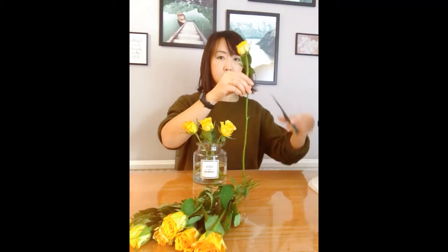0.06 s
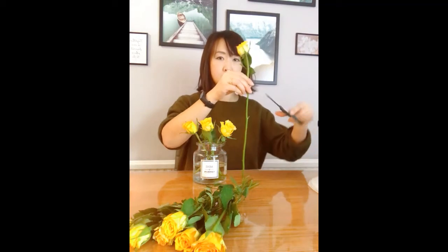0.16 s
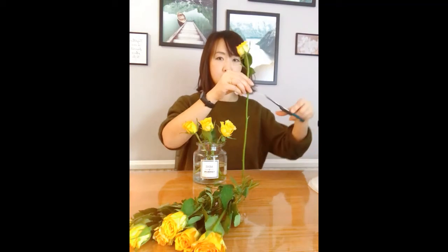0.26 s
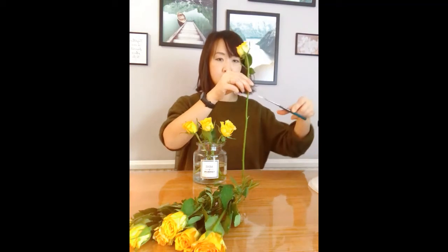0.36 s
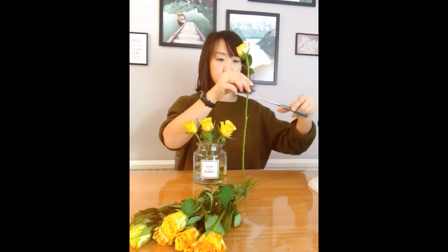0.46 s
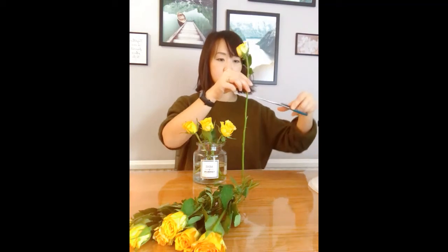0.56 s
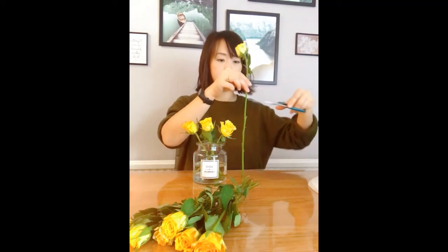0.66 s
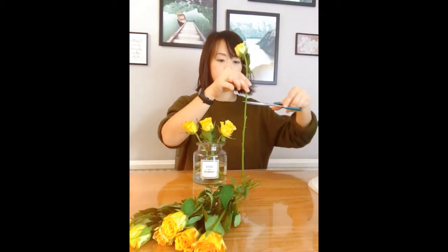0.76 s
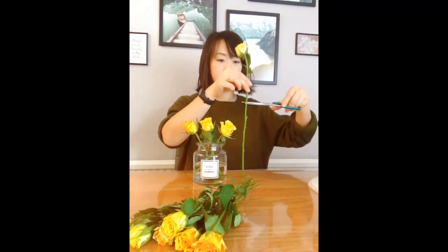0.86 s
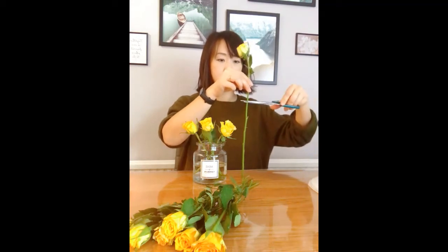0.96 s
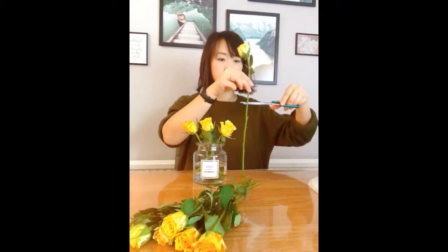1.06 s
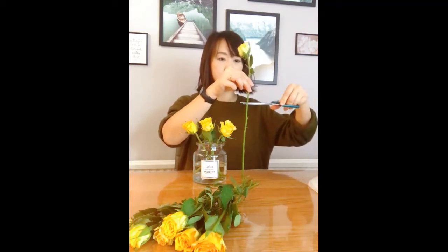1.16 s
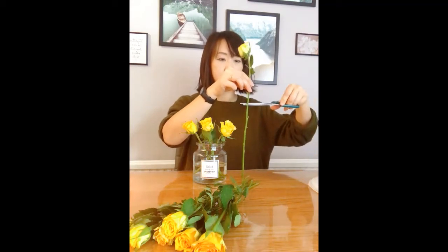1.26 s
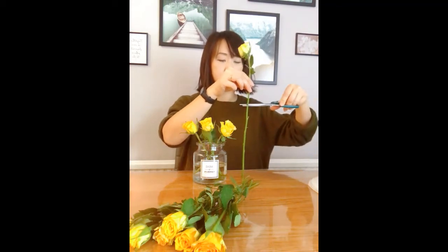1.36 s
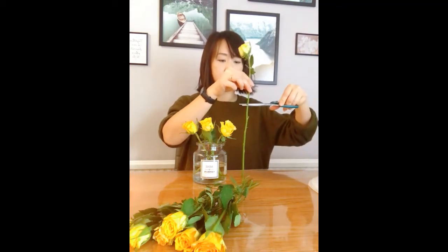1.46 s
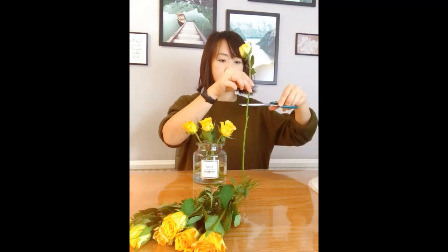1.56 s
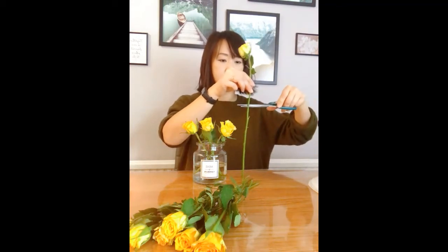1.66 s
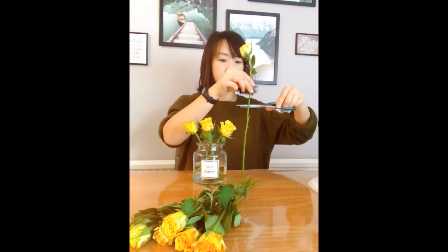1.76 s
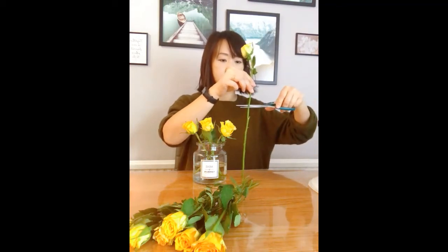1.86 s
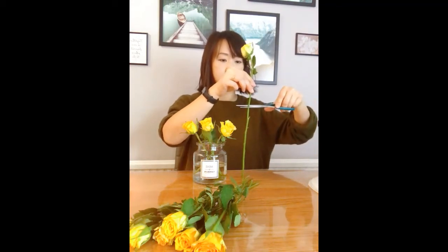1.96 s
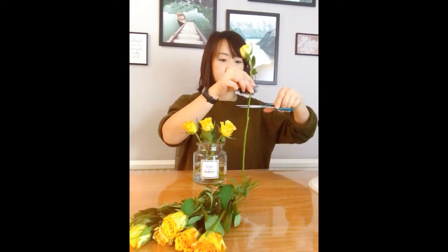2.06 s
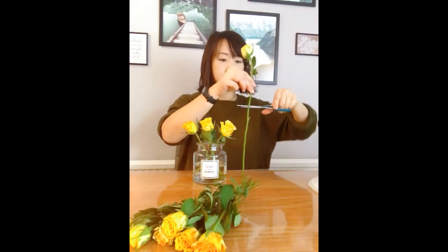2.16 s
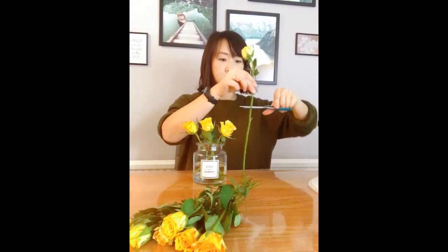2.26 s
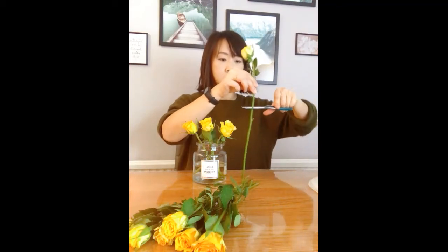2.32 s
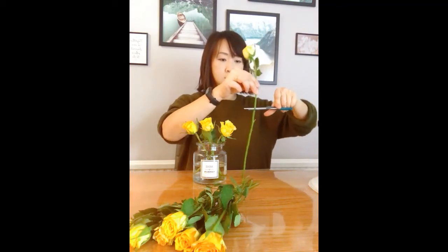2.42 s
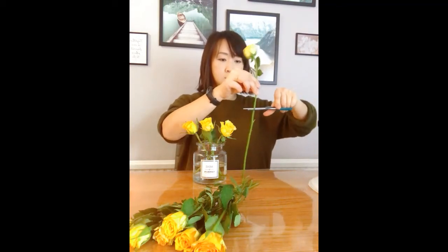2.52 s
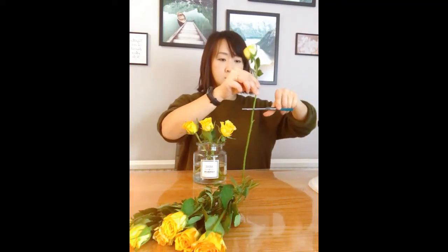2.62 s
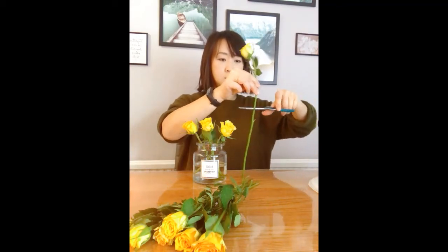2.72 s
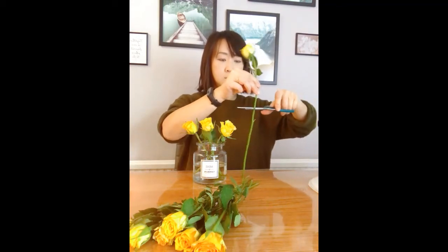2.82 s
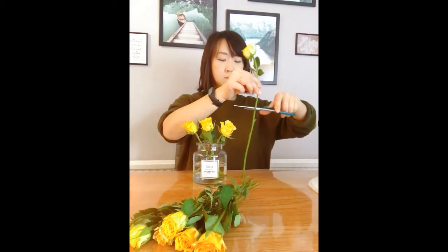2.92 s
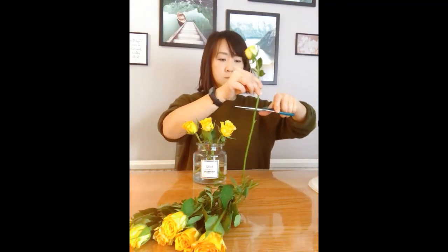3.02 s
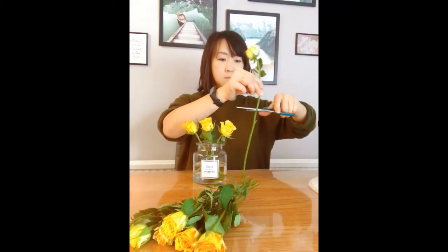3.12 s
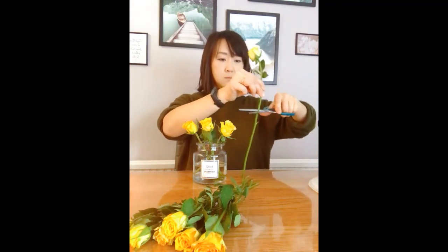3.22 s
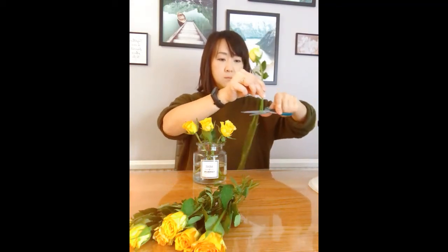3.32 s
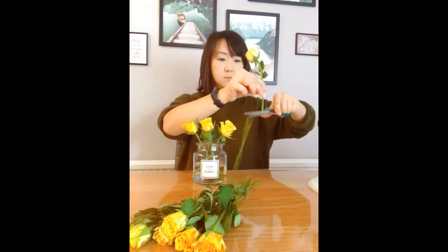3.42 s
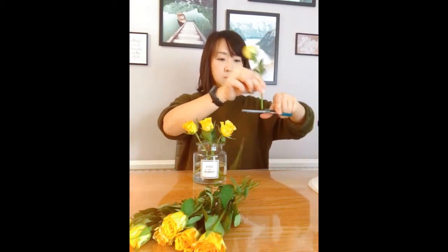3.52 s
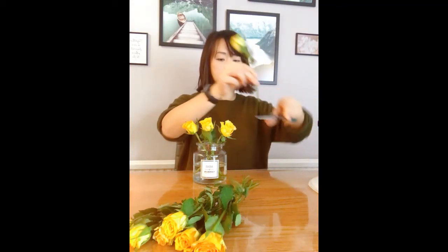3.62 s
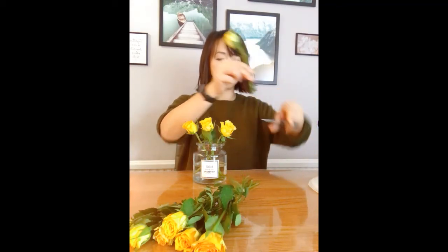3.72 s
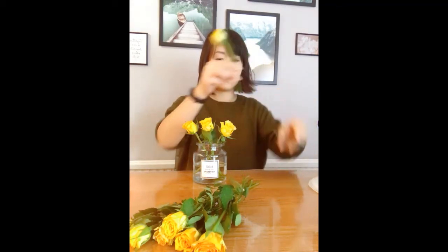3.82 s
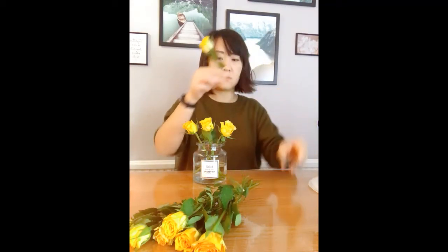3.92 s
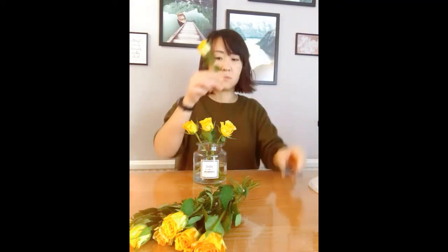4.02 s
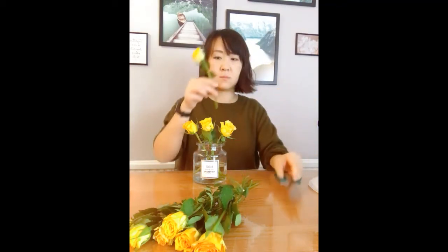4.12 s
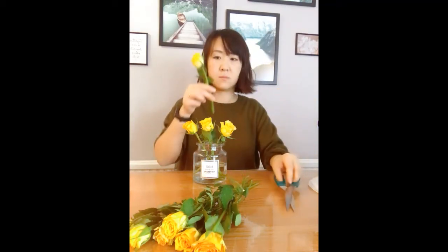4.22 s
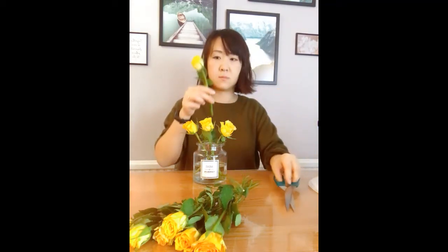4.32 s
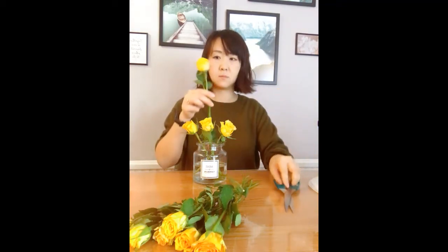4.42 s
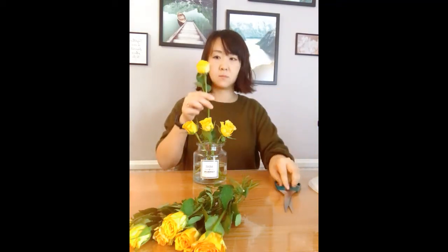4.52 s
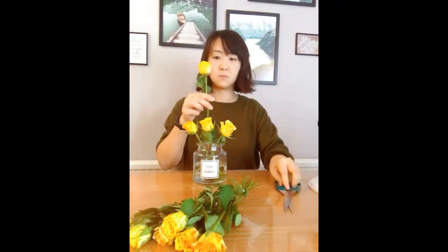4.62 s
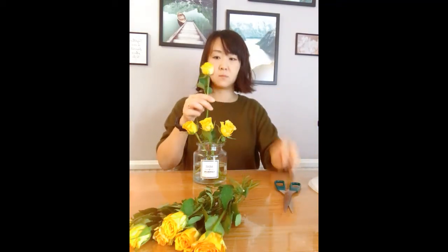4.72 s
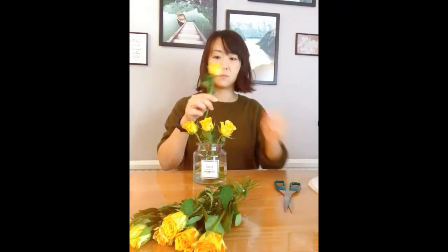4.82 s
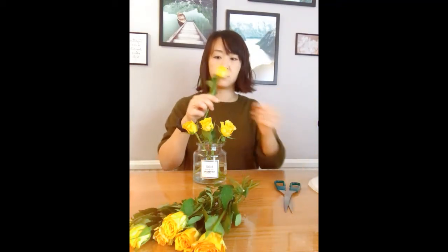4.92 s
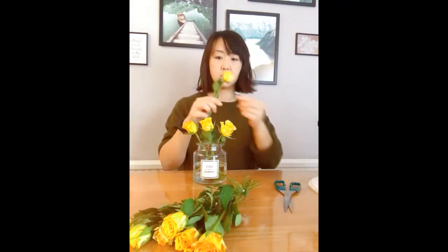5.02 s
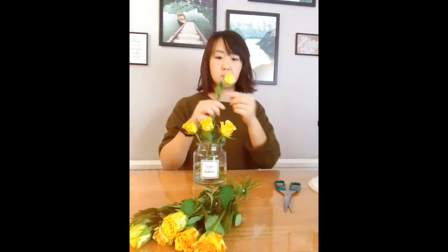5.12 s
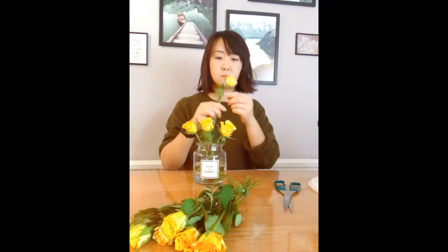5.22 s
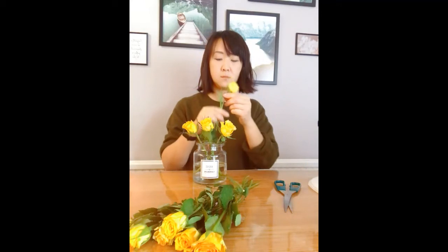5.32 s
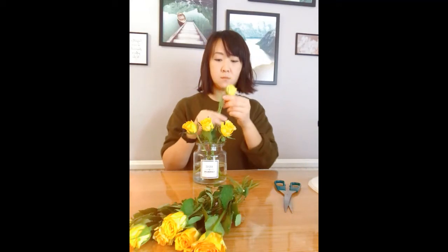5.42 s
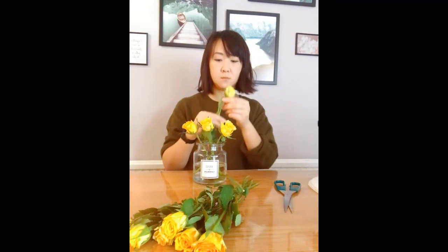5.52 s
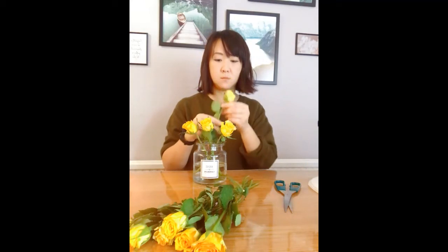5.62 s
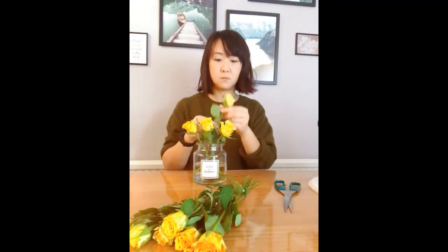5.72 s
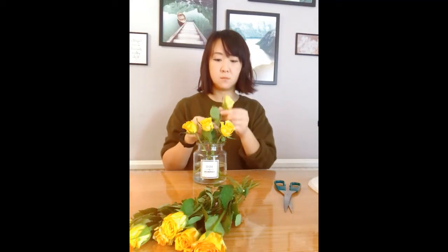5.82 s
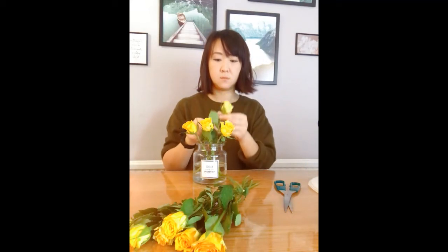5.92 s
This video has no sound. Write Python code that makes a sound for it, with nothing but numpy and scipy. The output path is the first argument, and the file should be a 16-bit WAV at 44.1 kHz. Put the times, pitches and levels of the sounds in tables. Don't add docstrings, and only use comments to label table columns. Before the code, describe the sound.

A small quiet room, heard close through a small microphone, with low murmur and soft hiss throughout. A sleeve and leaf brush faintly at the start. Around 0.35-0.41 s scissor blades slide apart with small clicks, ending on a firm pivot stop. Near silence follows until 2.35 s, when light nibbles lead to a bright, damped bite at 2.47 s. At 2.99 s the pivot slackens dully and the blades regrip. From 3.37 s the stem creaks in tiny stick-slip clicks, then at 3.65 s comes the loudest event: chatter and a crisp metallic snap with a very short rising squeal. At 3.83 s a glass jar pings briefly; from 3.88 s the woody stem clatters and rolls until about 4 s. A cloth brush at 4.3 s precedes scissors clinking onto wood at 4.5 s. Handles tip and drum hollowly at 4.82 s, the board humming. Leaf ticks and rustles end it, 5.5-5.95 s.

```python
import sys
import numpy as np
from scipy import signal
from scipy.fft import rfft, irfft, next_fast_len
from scipy.io import wavfile
from scipy.ndimage import uniform_filter1d

SR = 44100
rng = np.random.default_rng(int(sys.argv[2]) if len(sys.argv) > 2 else 0)


def elevation(decibels):
    levels = np.asarray(decibels, float)
    return 10 ** (levels / 20)


def pcm_store(signal):
    levels = np.round(np.clip(np.atleast_2d(signal), -1, 1) * 32767)
    wavfile.write(sys.argv[1], SR, levels.astype(np.int16).T)


N = 263277
SIZE = 8192
HISS_TOP_HZ = 15800


def unit(x):
    return x / np.sqrt(np.mean(x ** 2, axis=-1, keepdims=True) + 1e-30)


def along(points, hz):
    f, v = np.transpose(points)
    return np.interp(np.log(hz + 1), np.log(f + 1), v)


def add(track, start_s, sound):
    spot = track[round(start_s * SR):][:len(sound)]
    spot += sound[:len(spot)]


def through(force, modes):
    m = next_fast_len(force.shape[-1] + SIZE // 2)
    f = np.fft.rfftfreq(m, 1 / SR)
    body = 0
    for k, (hz, width_hz, db) in enumerate(modes):
        resonance = 1j * f * width_hz / (hz * hz - f * f + 1j * f * width_hz)
        body = body + (-1) ** k * elevation(db) * resonance
    soft = 1 / (1 + 1j * f / (1.14 * modes[-1][0])) ** 2
    small = 1j * f / (1j * f + 0.66 * modes[0][0])
    return irfft(rfft(force, m) * body * soft * small, m)[..., :force.shape[-1]]


CONTACT_KINDS = {"catch": (-4, -9, 0.3, 1, 1.2), "open": (-3, 3.5, 2, 1.54, 3), "stop": (3, -27, 2, 1, 2.7),
                 "bite": (-3.5, -1.5, 0.36, 1.1, 2.5), "nibble": (0, .5, 0.88, 0.64, 0.43),
                 "cut": (0, -5.5, 1, 1.17, 1.5), "snap": (0.035, .3, 0.81, 0.098, 1.3),
                 "shut": (2.8, 8.5, 1, 0.8, .7), "fall": (-1, -24, 1, -0.5, 1.5),
                 "thorn": (0.96, 0.18, 0.5, 1.05, 1.8), "laid": (2.5, 1, -0.2, 1.5, 1.8),
                 "knock": (5, -6, 0.19, 1, 3.5), "leaf": (0, -17, 1, 2, 3), "slack": (9, -12.5, 1.5, 1, 2),
                 "regrip": (-0.95, 0, 0.72, 0.93, 1), "set": (-0.26, 1.7, 0.85, 0.64, 2.5),
                 "tip": (-6.5, -6, 0.1, 1, 4)}


def contacts(rows, body, kind):
    track = np.zeros(N)
    t = np.arange(SIZE // 2) / SR
    middle_db, high_db, middle_share, high_share, contact_ms = CONTACT_KINDS[kind]
    for start_s, peak_db, edge_db in rows:
        force = rng.standard_normal(len(t)) * np.exp(-t / (0.00081 * contact_ms))
        force[0] = 9
        levels_db = (peak_db,
                     peak_db + middle_db + middle_share * edge_db,
                     peak_db + high_db + high_share * edge_db)
        for level_db, group in zip(levels_db, body):
            ring = through(force, group)
            add(track, start_s, elevation(level_db) * ring / np.abs(ring).max())
    return track


def repeated(rows, gap_s, count, loss_db):
    return [(s + k * gap_s, db - k * loss_db, edge_db) for s, db, edge_db in rows for k in range(count)]


def rubbing(rows, body, grit_db):
    s, *levels_db = np.transpose(rows)
    n = round((s[-1] - s[0]) * SR)
    spikes = np.minimum(rng.exponential(size=n // 32 + 1), 2.5)
    grit = elevation(grit_db * np.repeat(spikes, 32)[:n])
    force = grit * rng.standard_normal(n)
    t = s[0] + np.arange(n) / SR
    fade = np.clip(np.minimum(t - s[0], s[-1] - t) / 0.0018, 0, 1)
    track = np.zeros(N)
    for level_db, group in zip(levels_db, body):
        add(track, s[0], fade * elevation(np.interp(t, s, level_db)) * unit(through(force, group)))
    return track


STROKE_KINDS = {"sleeve": (0, -8, 10.5, 11, 0), "open": (-7, -10, 13, 2.5, 1.5), "bite": (-5, -6, 9, 2, 8),
                "cut": (0.5, -5.5, 12.5, 14.5, 3.5), "shear": (3.5, -1.5, 11.5, 13.5, -4),
                "tumble": (-3, -15, -3, 29, 13), "rock": (1.1, 1.5, -2, 27, 3),
                "leaf": (-3, -11, 19, 9.5, 4.5)}


def strokes(rows, body, kind):
    middle_db, high_db, swell_db, fading_db, grit_db = STROKE_KINDS[kind]
    mix_db = np.array([0, middle_db, high_db])
    track = np.zeros(N)
    for start_s, fullest_s, end_s, db in rows:
        shape = [(start_s, *db - swell_db + mix_db),
                 (fullest_s, *db + mix_db),
                 (end_s, *db - fading_db + mix_db)]
        track += rubbing(shape, body, grit_db)
    return track


# pitch_hz, width_hz, level_db
BURR = [
    [(2660, 380, 0)],
    [(3270, 600, 0)],
    [(4100, 420, 0)],
]


def catches(rows):
    return contacts(rows, BURR, "catch")


# pitch_hz, density_db (per Hz)
AIR_SPECTRUM = [(12, -25), (20, 4), (145, -2), (214, -5), (584, -11.5), (1590, -17.5), (11200, -27),
                (15700, -33)]
# time_s, level_db
AIR_LEVEL = [(0.0, -65), (0.9, -66.5), (3.42, -65.5), (4.89, -66), (5.97, -66)]


def air(patchy_db):
    z = signal.stft(rng.standard_normal(N + SIZE), nperseg=512)[2]
    field = uniform_filter1d(uniform_filter1d(rng.standard_normal(z.shape), 8, 0), 16, 1)
    noise = signal.istft(z * elevation(patchy_db * field / field.std()), nperseg=512)[1]
    hz = np.fft.rfftfreq(len(noise), 1 / SR)
    color = elevation(along(AIR_SPECTRUM, np.minimum(hz, 1.1 * HISS_TOP_HZ))) * (hz < HISS_TOP_HZ)
    s, db = np.transpose(AIR_LEVEL)
    level = elevation(np.interp(np.arange(N) / SR, s, db) + 2.5)
    return level * unit(irfft(rfft(noise) * color, len(noise))[:N])


# pitch_hz, width_hz, level_db
LEAF_BODY = [
    [(2430, 710, -0.022), (3500, 710, -1.5)],
    [(6000, 7100, 0)],
    [(11200, 12000, 0)],
]
# start_s, peak_db, edge_db
LEAF_PICKS = [(5.507, -51, -7), (5.551, -46.5, -7.5), (5.639, -58, -6), (5.659, -61, 1.5), (5.689, -67, 14),
              (5.695, -61, -2.5), (5.838, -62, 5), (5.863, -55.5, -10)]
# start_s, fullest_s, end_s, level_db
LEAF_RUSTLE = [
    (0, .003, .045, -69),
    (.15, .25, .3, -75),
    (5.61, 5.644, 5.76, -68),
    (5.76, 5.89, 5.96, -73),
]
# pitch_hz, width_hz, level_db
SLEEVE_CLOTH = [
    [(410, 180, 2), (795, 400, -6)],
    [(1150, 500, 2.5), (1990, 1000, 0)],
    [(3500, 2000, 0)],
]
# start_s, fullest_s, end_s, level_db
SLEEVE_BRUSH = [
    (0, .003, 0.048, -67.5),
    (4.27, 4.335, 4.41, -71),
]


def leaves_and_sleeve():
    ticks = contacts(LEAF_PICKS, LEAF_BODY, "leaf")
    return ticks + strokes(LEAF_RUSTLE, LEAF_BODY, "leaf") + strokes(SLEEVE_BRUSH, SLEEVE_CLOTH, "sleeve")


# start_s, peak_db, pitch_hz, length_s
JOLTS = [(0.184, -56.5, 58.7, 0.03), (0.333, -59, 79.4, 0.054), (.375, -55.5, 166, 0.037),
         (0.401, -45.5, 64.5, 0.0087), (3.665, -42.5, 56.6, 0.023), (4.099, -53.5, 45, 0.033),
         (4.49, -53, 50, 0.12), (4.723, -63, 54.7, 0.07), (4.824, -58, 54.5, 0.075),
         (4.8183, -32, 495, 0.029), (4.826, -38.5, 240.3, 0.036)]


def thumps():
    track = np.zeros(N)
    t = np.arange(SIZE) / SR
    for start_s, peak_db, pitch_hz, length_s in JOLTS:
        x = 3 * t / length_s
        push = np.e * x * np.exp(-x)
        add(track, start_s, elevation(peak_db) * push * np.sin(2 * np.pi * pitch_hz * t))
    return track


# pitch_hz, width_hz, level_db
OPEN_BLADES = [
    [(876, 240, -8), (1380, 150, -8), (2220, 250, 1), (2750, 460, -7), (3600, 250, -1.5)],
    [(4500, 260, 3), (5700, 800, -10), (8700, 560, 2)],
    [(10900, 570, 5), (12500, 1100, -2), (13700, 1600, -4)],
]
# start_s, peak_db, edge_db
PARTING = [
    (.3527, -54, -1),
    (.3794, -54.5, 8),
    (.3802, -34, -12),
    (.3815, -45, -13),
    (.3845, -54, -12),
    (.3893, -48, -13),
]
# pitch_hz, width_hz, level_db
PIVOT_BODY = [
    [(1500, 1700, -9), (2560, 370, 8.5), (3200, 750, 3), (4150, 470, 1)],
    [(5440, 510, 0), (7650, 720, -1), (9400, 1900, -5.5)],
    [(11000, 1500, 0), (14000, 2500, -6)],
]
# start_s, peak_db, edge_db
PIVOT_STOP = [
    (.4074, -29, -8.5),
    (.4084, -31.5, -5),
]
# start_s, peak_db, edge_db
OPENING_CATCHES = [
    (.4051, -37.5, 6),
]
# start_s, fullest_s, end_s, level_db
OPENING_SLIDE = [
    (.335, .353, .366, -56.5),
    (.36, .369, .402, -56.5),
    (.408, .412, .43, -62.5),
]


def blades_open():
    clicks = contacts(PARTING, OPEN_BLADES, "open") + contacts(PIVOT_STOP, PIVOT_BODY, "stop")
    return clicks + catches(OPENING_CATCHES) + strokes(OPENING_SLIDE, OPEN_BLADES, "open")


# pitch_hz, width_hz, level_db
HANDLE_LOOPS = [
    [(196, 220, -9), (350, 146, 1), (505, 570, -9.5)],
    [(670, 450, -3.5), (1050, 260, 1.5)],
    [(1590, 170, -0.5), (1960, 1000, 2)],
]
# start_s, peak_db, edge_db
HANDLE_KNOCKS = [
    (.4062, -54, 13),
    (2.4715, -48, -20),
    (2.9938, -54, -25),
    (3.652, -38, -5.5),
    (3.8881, -64, 30),
]


def handles_knock():
    return contacts(HANDLE_KNOCKS, HANDLE_LOOPS, "knock")


# pitch_hz, width_hz, level_db
STEM_HELD_BLADES = [
    [(2000, 180, -31), (2140, 1100, -4.5), (2580, 350, 9), (3170, 510, -16)],
    [(5360, 2200, 2.5), (7600, 3000, 0.5)],
    [(9900, 900, -1), (11870, 320, 2.5), (12700, 530, 1), (14300, 1600, -8)],
]
# start_s, peak_db, edge_db
STEM_BITES = [(2.4027, -52, -1), (2.4715, -26.5, -9.5), (2.4746, -34, -3), (2.4796, -60, 12),
              (2.4835, -47, -6), (2.49, -64, 11), (2.5069, -49.5, -0.5), (2.5725, -57, -2.5),
              (2.5784, -52, -9), (2.7127, -70, 13)]
# start_s, peak_db, edge_db
BITE_CATCHES = [
    (2.4298, -42.5, -15),
]
# start_s, peak_db, edge_db
LIGHT_TOUCHES = [
    (2.3558, -56, 5.5),
    (2.363, -61, 9),
    (2.382, -61, 10),
    (2.3897, -60, 10),
]
# start_s, fullest_s, end_s, level_db
BITE_SLIDE = [
    (2.34, 2.35, 2.42, -72),
    (2.42, 2.45, 2.5, -69),
]


def blades_bite():
    clicks = contacts(STEM_BITES, STEM_HELD_BLADES, "bite") + contacts(LIGHT_TOUCHES, STEM_HELD_BLADES, "nibble")
    return clicks + catches(BITE_CATCHES) + strokes(BITE_SLIDE, STEM_HELD_BLADES, "bite")


# pitch_hz, level_db, t60_s
TABLE_EDGE_HUM = [(111, -1, 0.14), (211, -6, 0.22), (331, -5, 0.38), (442, -2, 0.27), (511.5, 3, 0.29),
                  (1134, -5, .17), (1222, -5, .23), (1621, -7, 0.39), (1780, -9, 0.34), (2239, -21, .24)]
TABLE_TOP_HUM = [(110.7, -3.5, .2), (231, -4, 0.22), (314, 3.5, 0.18), (389, 0.5, 0.31), (466, -7.5, 0.4),
                 (518, -6, .4), (698, -15, .2), (896, -14.5, .3), (1195, -17, .22), (1620, -11, 0.24),
                 (1820, -16, .2), (1970, -22, .22), (2390, -10, .1), (2848, -17, .18)]
STEM_LASTING = [(346, -0.5, 0.16), (466, 3.5, 0.17), (667, -6, 0.14), (788, -3, 0.13), (894, -5, 0.11),
                (1186, -6, .2), (2440, -12, .12)]
BLADE_HUM = [(10980, -12, 0.14), (11070, -17, 0.21), (11290, -1, 0.09), (11630, -10.5, 0.33),
             (11830, -4, 0.16), (12400, -13, 0.28), (12490, -7.5, 0.16), (12870, -17, 0.51),
             (13310, -13.5, 0.11)]
# start_s, level_db, swell_s
HUM_BLOWS = [
    (4.497, -46, 0.0043),
    (4.84, -40.5, 0.0056),
    (3.888, -46.5, 0.0074),
    (4.4993, -49, .001),
    (2.4785, -66, .001),
    (2.995, -59, .001),
    (3.664, -52, .002),
]


def hums():
    track = np.zeros(N)
    t = np.arange(2 * SIZE) / SR
    bodies = [TABLE_EDGE_HUM, TABLE_TOP_HUM, STEM_LASTING] + [BLADE_HUM] * len(HUM_BLOWS)
    for (start_s, db, swell_s), modes in zip(HUM_BLOWS, bodies):
        ring = 0
        for pitch_hz, level_db, t60_s in modes:
            decay = elevation(level_db - 60 * t / np.clip(t60_s, .02, .4))
            ring = ring + decay * np.sin(2 * np.pi * pitch_hz * t)
        add(track, start_s, elevation(db) * ring * (1 - np.exp(-t / swell_s)))
    return track


# pitch_hz, width_hz, level_db
LOOSE_BLADES = [
    [(1640, 1600, -6), (2310, 390, 4), (3070, 330, 3.5), (4170, 300, 0.5)],
    [(5630, 630, -3), (7300, 1200, -1), (9300, 1100, 1)],
    [(10600, 1200, 2), (12200, 1200, -1), (14000, 2500, -6)],
]
# start_s, peak_db, edge_db
GRIP_CLICKS = [(2.9938, -40, 11), (2.9946, -48, 5), (2.9955, -58, 8), (3.0015, -63, 16), (3.0028, -65, 16),
               (3.0045, -58, 12), (3.013, -61, 10), (3.0069, -62, 5)]
# start_s, peak_db, edge_db
SLACK_CLICKS = [
    (2.9856, -41, -12),
    (2.9869, -31, -15),
    (2.9986, -42, -8),
]


def blades_regrip():
    return contacts(GRIP_CLICKS, LOOSE_BLADES, "regrip") + contacts(SLACK_CLICKS, LOOSE_BLADES, "slack")


# pitch_hz, width_hz, level_db
DEEP_BLADES = [
    [(978, 700, -14), (2380, 190, 5), (3300, 2200, -15.5)],
    [(4330, 820, -6), (5150, 250, -2), (5640, 430, -4), (6340, 300, 4), (6930, 300, -0.5), (8120, 180, -4)],
    [(9710, 660, -1), (12220, 950, 0.12), (13500, 1500, -2)],
]
# start_s, peak_db, edge_db
SINGLE_SLIPS = [(3.3735, -58, 11), (3.4178, -59, 6), (3.4374, -59, 6), (3.468, -54.5, 9), (3.4773, -42, 2),
                (3.491, -61, 19), (3.4994, -47.5, 4.5), (3.517, -55, 2), (3.5236, -56, 2),
                (3.6294, -58.5, 15), (3.64, -45.5, 2), (3.643, -42.5, 9.5)]
SLOW_TRIPLES = [
    (3.3828, -53.5, 2.5),
]
FAST_TRIPLES = [
    (3.4287, -52, 7),
    (3.4858, -48.5, 5.5),
]
# start_s, fullest_s, end_s, level_db
CUT_SLIDE = [
    (3.372, 3.41, 3.445, -68),
    (3.45, 3.485, 3.53, -69),
]


def stem_creaks():
    slips = repeated(SLOW_TRIPLES, gap_s=0.013, count=3, loss_db=3.5)
    slips += repeated(FAST_TRIPLES, gap_s=0.0018, count=3, loss_db=-1.0)
    slips += SINGLE_SLIPS
    return contacts(slips, DEEP_BLADES, "cut") + strokes(CUT_SLIDE, DEEP_BLADES, "cut")


# pitch_hz, width_hz, level_db
CLOSED_BLADES = [
    [(1050, 250, -11.5), (2100, 230, 0.5), (2540, 400, 0), (3360, 830, -6.5)],
    [(3970, 360, -7), (4970, 830, -7), (5790, 870, -3), (7850, 1000, -4)],
    [(9900, 600, -3), (11300, 870, 2), (13500, 1020, -7)],
]
# start_s, peak_db, edge_db
CHATTER = [(3.6471, -31.5, 8.5), (3.6487, -26.5, 4), (3.6501, -28, 9.5), (3.6511, -31, 6.5),
           (3.6533, -26.5, 7), (3.6548, -42.5, 14), (3.6568, -35.5, -4), (3.659, -34, -8.5)]
# pitch_hz, width_hz, level_db
BLADE_EDGES = [
    [(1000, 680, -6.5), (2330, 340, -3)],
    [(4300, 680, -9), (6000, 900, -1), (7500, 500, 4.5), (8080, 600, 3.5)],
    [(11080, 910, 4.5), (12100, 900, -8), (13240, 900, 0)],
]
# start_s, peak_db, edge_db
MEETING = [
    (3.6516, -27.5, -1.5),
    (3.652, -20.5, 3),
]
# start_s, fullest_s, end_s, level_db
SHEAR_STROKE = [
    (3.645, 3.652, 3.668, -37.5),
]


def blades_snap():
    clicks = contacts(CHATTER, CLOSED_BLADES, "snap") + contacts(MEETING, BLADE_EDGES, "shut")
    return clicks + strokes(SHEAR_STROKE, CLOSED_BLADES, "shear") + squeal()


# time_s, pitch_hz, level_db
SQUEAL_GLIDE = [
    (3.6555, 9200, -44),
    (3.6575, 9900, -33.5),
    (3.6595, 10800, -28),
    (3.662, 11500, -27.5),
    (3.664, 11700, -34.5),
    (3.6665, 11800, -50.5),
]


def squeal():
    s, hz, db = np.transpose(SQUEAL_GLIDE)
    t = np.arange(s[0], s[-1], 1 / SR)
    rough = 0.19 * rng.standard_normal(len(t))
    phase = 2 * np.pi * np.cumsum(np.interp(t, s, hz)) / SR
    track = np.zeros(N)
    add(track, s[0], elevation(np.interp(t, s, db)) * np.sin(phase + rough))
    return track


# pitch_hz, level_db, t60_s
GLASS = [(2940, -26, 0.046), (3225, -15, 0.04), (3720, -3, 0.057), (3745, -12, .1), (3904, -0.5, 0.081),
         (4000, -9, 0.032), (4830, -10, 0.11), (5000, -13, .044), (6430, -28, 0.18)]
# struck_s, level_db, damped_s
GLASS_TOUCH = (3.8322, -38.5, 3.884)


def jar():
    struck_s, db, damped_s = GLASS_TOUCH
    t = np.arange(SIZE) / SR
    ring = 0
    for pitch_hz, level_db, t60_s in GLASS:
        ring = ring + elevation(level_db - 60 * t / t60_s) * np.sin(2 * np.pi * pitch_hz * t)
    damping = elevation(db - 60 * np.maximum(t - damped_s + struck_s, 0) / .03)
    track = np.zeros(N)
    add(track, struck_s, damping * ring * (1 - np.exp(-t / 0.0003)))
    return track


# pitch_hz, width_hz, level_db
STEM_BODY = [
    [(640, 200, -19), (870, 120, -3), (1170, 135, 4.5), (1570, 200, 1), (1880, 230, 4)],
    [(2440, 230, 5), (2770, 240, 2), (3140, 400, -3), (3800, 500, -3.5), (5000, 920, -6)],
    [(5430, 550, 0), (8600, 1500, 4), (12000, 2400, -1)],
]
# start_s, peak_db, edge_db
STEM_BOUNCES = [(3.88, -42.5, -8), (3.8852, -32.5, 5), (3.8868, -34, -3), (3.8881, -27, 1), (3.89, -35, -3),
                (3.8926, -39, -3), (3.8945, -41, 3), (3.8971, -38, -10), (3.8995, -45, 6), (3.902, -42, 6),
                (3.9045, -41, -3), (3.911, -42, -8), (3.9135, -47, 8), (3.9201, -48, 0), (3.927, -50, -6),
                (3.931, -53, 1), (3.941, -50, -4), (3.948, -52, 3), (3.9582, -48, 0), (3.968, -50, -2),
                (3.972, -53, 2), (3.987, -59, 2)]
# start_s, peak_db, edge_db
THORN_TICKS = [
    (3.833, -43.5, -7),
    (3.8773, -62, 9),
    (3.8819, -47.5, 9),
    (4.0853, -66.5, 24),
]
# start_s, peak_db, edge_db
FALL_CATCHES = [
    (3.9391, -35.5, -1),
]
# start_s, turn_s, end_s, level_db (at turn_s)
STEM_TUMBLE = [
    (3.882, 3.886, 3.99, -49),
]


def stem_falls():
    clatter = contacts(STEM_BOUNCES, STEM_BODY, "fall") + contacts(THORN_TICKS, STEM_BODY, "thorn")
    return clatter + catches(FALL_CATCHES) + strokes(STEM_TUMBLE, STEM_BODY, "tumble")


# pitch_hz, width_hz, level_db
LAID_BLADES = [
    [(2300, 300, -2), (3010, 300, -3.5), (3610, 410, 0.5), (4260, 510, 1.5)],
    [(5700, 1100, 1.5), (8720, 2100, -5)],
    [(9950, 880, -2), (11700, 500, 8), (12400, 650, 10.5), (13360, 320, 3), (14900, 1200, -11)],
]
# start_s, peak_db, edge_db
BLADES_DOWN = [(4.4957, -30, -9), (4.4993, -33, 3.5), (4.5044, -55, -8), (4.5069, -60, 12),
               (4.5083, -56, 15), (4.7345, -48, -6.5), (4.7432, -63, -15), (4.8212, -48, -7)]


def blades_laid():
    return contacts(BLADES_DOWN, LAID_BLADES, "laid")


# pitch_hz, width_hz, level_db
EDGE_BOARD = [
    [(113, 21, -1.5), (197, 35, -8.5), (335, 62, -7), (447, 50, -2.5), (513, 48, 2.5), (570, 56, -7)],
    [(702, 66, -8.5), (1140, 52, -2.5)],
    [(1610, 100, -1.5), (1814, 114, -1.5), (2260, 270, -8.5), (3380, 470, -7)],
]
# start_s, peak_db, edge_db
TABLE_TAPS = [
    (4.4962, -37.5, -1),
    (4.5012, -42, -13),
    (4.5116, -36.5, -9),
    (4.5178, -57, -13),
    (4.7345, -62, 10.5),
    (4.7446, -55, -13),
]


def table_tapped():
    return contacts(TABLE_TAPS, EDGE_BOARD, "set")


# pitch_hz, width_hz, level_db
TABLE_BOARD = [
    [(110, 13, -15), (246, 38, -9), (388, 74, -24), (495, 84, 0.5), (560, 43, -12)],
    [(697, 53, 1.5), (825, 50, 0), (957, 67, -0.5), (1103, 43, -2), (1310, 130, -5)],
    [(1480, 140, 3), (1790, 110, 7), (2000, 110, 5), (2360, 280, -1.5), (2910, 140, 1), (3380, 590, -3),
     (4040, 2400, -9.5)],
]
# start_s, peak_db, edge_db
HANDLE_DROPS = [(4.8204, -31, -2), (4.8248, -34.5, -9), (4.8311, -32.5, 6.5), (4.8365, -28.5, -3),
                (4.8404, -43, 4), (4.8452, -49, 13), (4.8555, -51, 3), (4.8637, -33, -9)]
# start_s, turn_s, end_s, level_db (at turn_s)
HANDLE_ROCKING = [
    (4.82, 4.84, 4.92, -47),
]


def handles_tip():
    return contacts(HANDLE_DROPS, TABLE_BOARD, "tip") + strokes(HANDLE_ROCKING, TABLE_BOARD, "rock")


def scattered(x, share):
    m = next_fast_len(len(x) + SIZE)
    spectrum = rfft(x, m)
    octave = np.log2(np.fft.rfftfreq(m, 1 / SR) + 20)
    step_oct = .002
    grid = np.arange(octave[0], octave[-1], step_oct)
    power = np.interp(grid, octave, np.abs(spectrum) ** 2)
    fine = np.abs(uniform_filter1d(power, round(0.14 / step_oct))) + 1e-20
    coarse = np.abs(uniform_filter1d(power, round(0.49 / step_oct))) + 1e-20
    evened = (coarse / fine) ** (np.clip(share, 0, 1) / 2)
    return irfft(spectrum * np.interp(octave, grid, evened), m)


# pitch_hz, t60_s
ROOM_DECAY = [(150, 0.63), (600, 0.35), (2000, 0.31), (6000, 0.26), (12000, 0.22), (16000, 0.19)]
# pitch_hz, level_db
ROOM_COLOR = [(150, -7.5), (500, -6), (1200, -3.5), (3000, 0), (9000, .3), (14000, -2)]


def room(x, wet_db, scatter):
    out = x.copy()
    step = round(.4 * SR)
    for start in range(0, N, step):
        piece = x[start:start + step]
        if not piece.any():
            continue
        hz, t, z = signal.stft(rng.standard_normal(SR // 2), SR, nperseg=256)
        tail = signal.istft(z * elevation(-60 * t / along(ROOM_DECAY, hz)[:, None]), SR, nperseg=256)[1]
        tail *= 1 - np.exp(-np.arange(len(tail)) / SR / 0.00082)
        f = np.fft.rfftfreq(len(tail), 1 / SR)
        color = elevation(along(ROOM_COLOR, f)) * (f < HISS_TOP_HZ)
        tail = irfft(rfft(tail / np.linalg.norm(tail)) * color, len(tail))
        wet = signal.fftconvolve(scattered(piece, scatter), tail)
        add(out, start / SR + 0.0022, elevation(wet_db) * wet)
    return out


ROOM_SHARE = {"open": -24, "bite": -21, "regrip": -13.5, "cut": -17, "snap": -14.5, "jar": -5, "fall": -8.5,
              "laid": -8, "knock": -3.5, "set": -1.6, "tip": -6, "leaf": -13}
WALL_SCATTER = {"snap": .8, "fall": .6, "tip": 0.95, "set": 0.41, "laid": .3, "regrip": .5}


def scene():
    sources = {
        "leaf": leaves_and_sleeve(),
        "open": blades_open(),
        "knock": handles_knock(),
        "bite": blades_bite(),
        "regrip": blades_regrip(),
        "cut": stem_creaks(),
        "snap": blades_snap(),
        "jar": jar(),
        "fall": stem_falls(),
        "laid": blades_laid(),
        "set": table_tapped(),
        "tip": handles_tip()}
    mix = air(patchy_db=1.17) + thumps() + hums()
    for name, sound in sources.items():
        mix += room(sound, ROOM_SHARE[name], WALL_SCATTER.get(name, 0))
    return mix[None]


def band_limit(x):
    return signal.sosfilt(signal.butter(12, 16640, fs=SR, output="sos"), x)


def record(dry):
    mic = signal.butter(16, 15800, fs=SR, output="sos")
    return band_limit(signal.sosfilt(mic, dry))


dry = scene()
out = record(dry)
pcm_store(out)
```